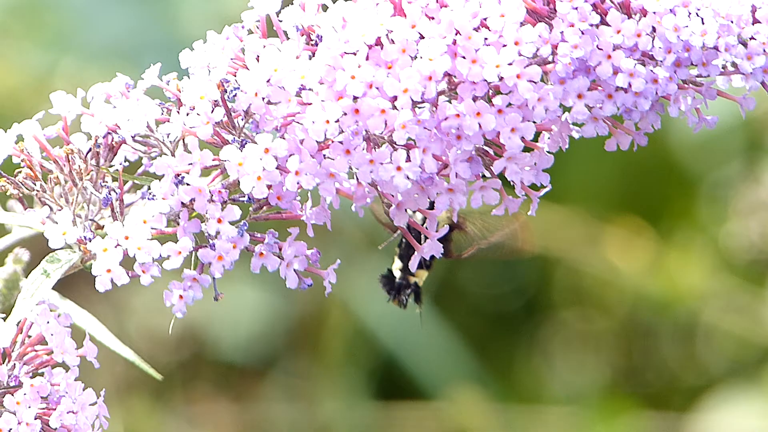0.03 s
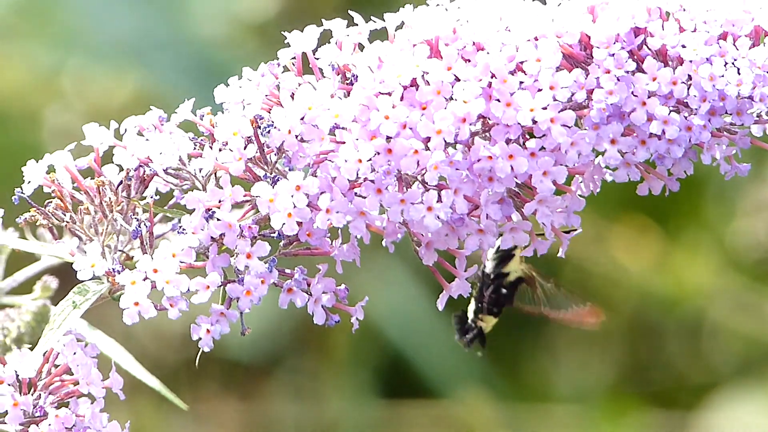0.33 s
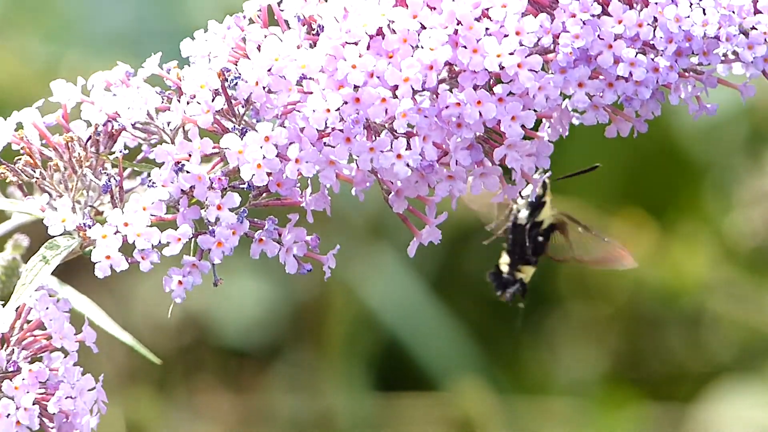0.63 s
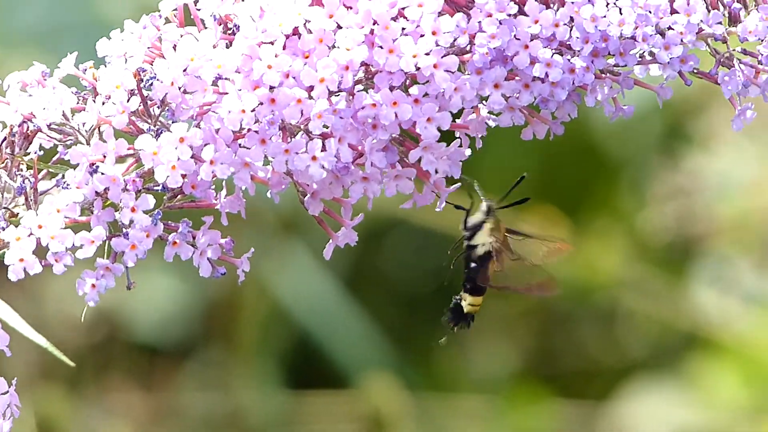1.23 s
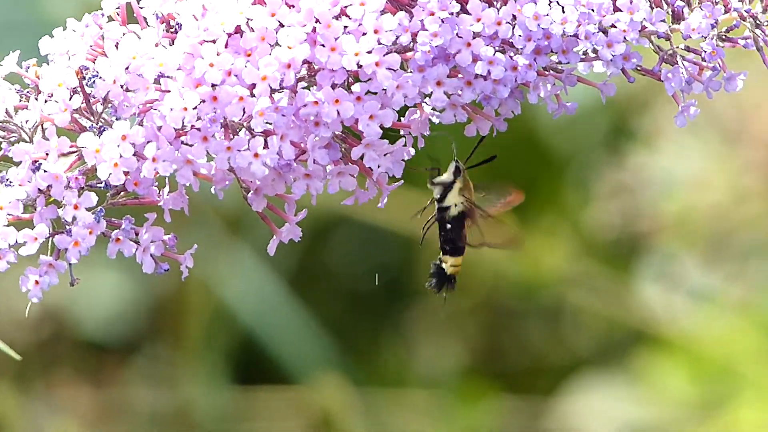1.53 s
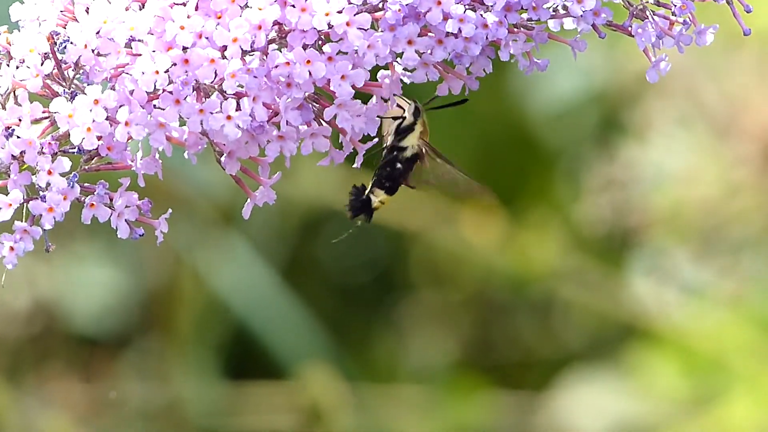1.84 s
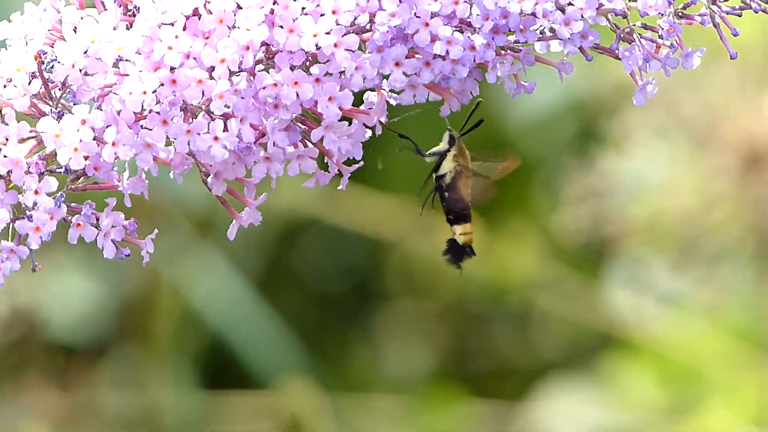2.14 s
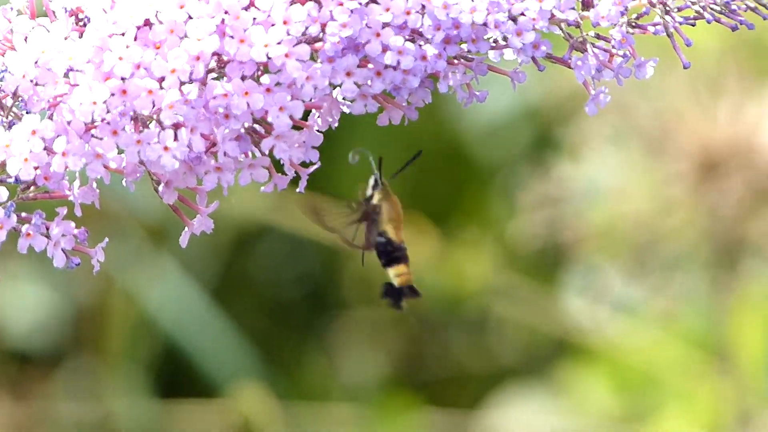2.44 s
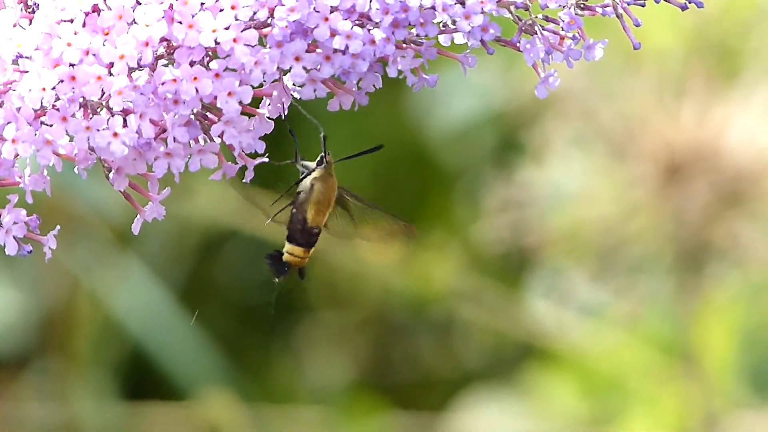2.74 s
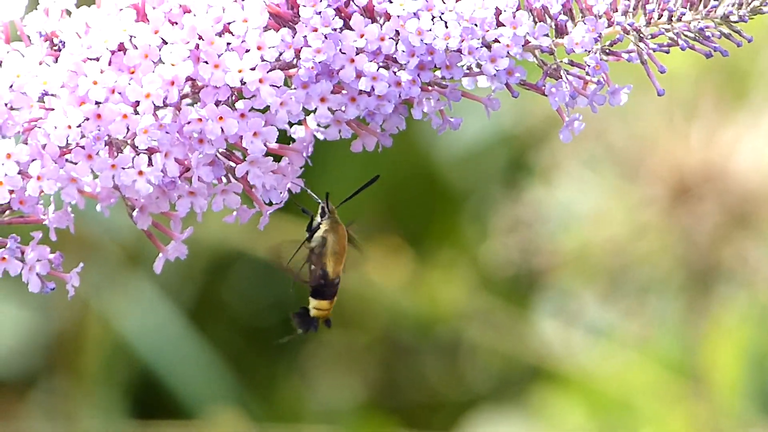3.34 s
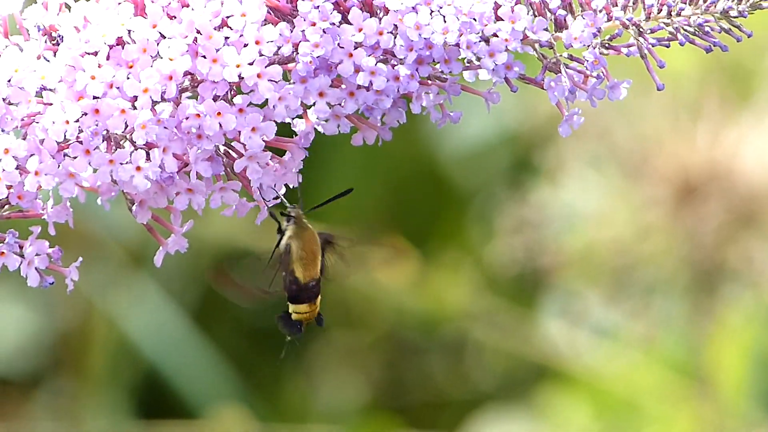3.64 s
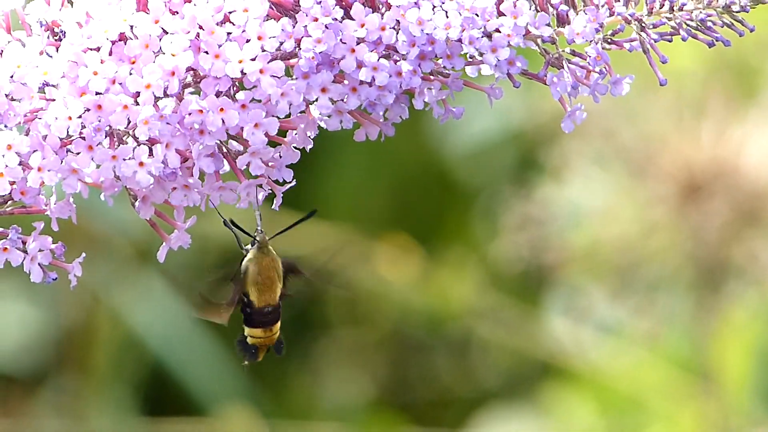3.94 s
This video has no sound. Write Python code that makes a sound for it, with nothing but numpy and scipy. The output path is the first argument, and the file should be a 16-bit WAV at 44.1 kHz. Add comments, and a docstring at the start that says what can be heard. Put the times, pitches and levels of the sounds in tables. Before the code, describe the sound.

Distant traffic rumbles steadily with a low engine drone, heard from a summer garden. A close bush cricket on the right rasps in even pulses over fainter insects, a small bird whistles three times, and the engine slows near the end.

```python
"""A summer garden. After a moment of silence: a wash of far traffic and leaves, a faint mechanical buzz with a
few wavering lines, an insect chorus, and a distant engine's exhaust droning on the right. From 0.4 s a close
bush cricket rasps three chirps a second with its wings; others answer from further off. A small bird whistles
near 1, 2 and 3 s. The engine drifts to the centre throughout and slows from about 3 s."""
import sys
import numpy as np
from scipy import signal
from scipy.fft import rfft, irfft
from scipy.io import wavfile

SR = 44100
rng = np.random.default_rng(int(sys.argv[2]) if len(sys.argv) > 2 else 0)


def inscribe(sig):
    """Save sig as 16-bit PCM at rate SR to the path in sys.argv[1].

    A 1-D sig is mono; a 2-D sig holds one channel per row.
    Samples are clipped to [-1, 1] before scaling.
    """
    pcm = np.round(np.clip(np.atleast_2d(sig).T, -1, 1) * 32767)
    wavfile.write(sys.argv[1], SR, pcm.astype(np.int16))


N = 176400
START_S, TOP_HZ, GARDEN_T60_S = .264, 15200, .2

# mechanical buzz envelope: freq_hz, relative_db
BUZZ_SPECTRUM = [(300, -6), (1700, -1.5), (2400, -4), (3900, -8.5), (4300, 2.5), (5200, -6.5), (7500, -7),
                 (8300, 0), (9500, -6), (12000, -28)]
BUZZ_HZ, BUZZ_DB, BUZZ_SCATTER_DB = 59.005, -61.5, 2
# wavering lines, mostly on harmonics of the buzz: pitch_hz, level_db
BUZZ_LINES = [(355.3, -61.5), (827, -61.5), (945, -72.5), (1242, -66), (1421, -78), (1616, -63.5),
              (1713, -85)]

# far traffic and leaves: freq_hz, relative_db
TRAFFIC_SPECTRUM = [(25, -12), (55, -22), (110, 5.5), (250, -0.5), (400, 2), (600, 2), (830, 1.5),
                    (1000, 0.5), (1230, -4.5), (1450, 0), (1650, -3), (2050, -10.5), (2900, -12.5),
                    (3700, -16), (5500, -15), (7200, -16.5), (10000, -23), (12000, -27.5), (15500, -38)]
# slow drift of the wash: time_s, treble_db, low_mid_db
TRAFFIC_DRIFT = [(.27, -0.3, 0.1), (1, -0.4, -0.7), (2, 1.6, 0.6), (2.6, .4, 1.6), (3.4, 0, 1.3),
                 (4, -.6, 2)]
# left-right likeness of the wash: freq_hz, correlation
TRAFFIC_CORRELATION = [(40, .8), (150, 0.19), (300, -0.24), (550, -0.45), (1000, 0.42), (2000, 0.48),
                       (5000, 0.53), (12000, 0.14)]
TRAFFIC_DB, SWELL_DB, FLICKER_DB = -47, .4, 0.95

# far insect bands: centre_hz, width_hz, level_db, pan_db
CHORUS_BANDS = [(4104, 200, -67, 3), (4720, 540, -67.5, 1), (8400, 1100, -63, -1), (8720, 360, -65.5, 3)]
CHORUS_FLUTTER_DB = 3

# contour of one bird call: age_s, pitch_hz, relative_db
CALL_CONTOUR = [(0, 4200, -5), (.012, 4650, 8), (0.022, 4950, 0), (.034, 4072, 7), (0.047, 3120, 6),
                (.062, 3160, -9), (.076, 3050, 7.5), (.092, 3400, 6), (.102, 4200, -15)]
# bird calls: start_s, gain_db
CALLS = [(1.113, -59.5), (2.038, -60), (2.974, -66)]
BIRD_PAN_DB, BIRD_ECHO_DB, BIRD_ROUGH_DB = 2.5, -5.5, 2.6

# far cricket chirps: start_s, length_s, pitch_hz, relative_db
NEIGHBOUR_CHIRPS = [(.25, 0.067, 8680, -57), (.29, .08, 9200, -62), (.34, .06, 8380, -57),
                    (.41, 0.04, 8400, -61), (.56, .11, 8850, -59.5), (.61, .06, 8370, -55),
                    (.65, 0.057, 9290, -62), (.76, 0.043, 8350, -68), (.89, 0.089, 8400, -57),
                    (1.0, .09, 9170, -60), (1.17, 0.1, 8480, -56), (1.38, 0.09, 8370, -58),
                    (1.42, 0.12, 9290, -63), (1.52, 0.075, 8600, -56.5), (1.67, 0.13, 8250, -60),
                    (1.84, 0.085, 9290, -60), (1.92, .06, 8330, -57), (2.01, 0.02, 8400, -50.5),
                    (2.19, 0.077, 8200, -58), (2.21, 0.048, 8600, -55), (2.3, 0.095, 9240, -67),
                    (2.4, 0.053, 8350, -60), (2.52, .06, 8710, -58), (2.64, 0.083, 8270, -59.5),
                    (2.7, 0.1, 9280, -64), (2.82, 0.062, 8700, -57), (2.87, .07, 8400, -58),
                    (3.11, .09, 9196, -67), (3.12, 0.078, 8300, -60), (3.14, .05, 8700, -49.5),
                    (3.36, 0.0589, 8370, -56), (3.49, 0.082, 8660, -55), (3.56, 0.18, 9110, -62.5),
                    (3.65, 0.078, 8450, -56.5), (3.81, 0.072, 8650, -58.5), (3.93, 0.066, 8610, -55)]
FAR_GAIN_DB, FAR_PAN_DB, FAR_ECHO_DB = 1, -6.5, -4
# near cricket chirps: start_s, length_s, pitch_hz, relative_db
NEAR_CHIRPS = [(.432, .074, 8700, -46), (.767, .078, 8680, -46), (1.098, .072, 8660, -47.5),
               (1.438, .072, 8680, -48.5), (1.777, .074, 8680, -45.5), (2.110, .074, 8720, -46.5),
               (2.440, .078, 8680, -46), (2.742, .084, 8670, -45), (3.062, .08, 8660, -45.5),
               (3.394, .078, 8700, -45), (3.728, .078, 8680, -46)]
NEAR_GAIN_DB, NEAR_PAN_DB, NEAR_ECHO_DB = -1.5, -7, -4.5
STROKE_HZ, STROKE_GLIDE_HZ, RASP_DEPTH = 112.56, 164.5, 0.12
CHIRP_ATTACK_S, CHIRP_RELEASE_S = 0.022, 0.02

# engine speed: time_s, cycle_hz
ENGINE_SPEED = [(0.27, 46.27), (0.6, 45.4), (1.0, 46.2), (1.5, 45.6), (1.85, 45.0), (2.36, 44.3),
                (2.55, 45.1), (2.72, 42.7), (2.92, 42.5), (3.08, 38.58), (3.28, 35.23), (3.55, 33.96),
                (3.72, 32.4), (4.0, 32.2)]
# engine position: time_s, pan_db
ENGINE_PATH = [(.3, -12), (1.1, -9), (1.9, -6), (2.7, -3.5), (3.4, -1.5), (4, -0.5)]
# 3rd engine order: time_s, relative_db
ORDER_3 = [(0.28, -61), (0.63, -51.7), (0.77, -66), (1.02, -45.5), (1.19, -50), (1.82, -48.5), (1.95, -60),
           (2.06, -49), (2.46, -58), (2.57, -44), (2.97, -47.5), (3.07, -53), (3.6, -55.5), (3.98, -48)]
# 4th engine order: time_s, relative_db
ORDER_4 = [(0.28, -47.5), (0.37, -56), (0.44, -45.0), (0.62, -58), (0.7, -43.5), (0.92, -40.5),
           (1.3, -43.5), (1.41, -39.5), (1.81, -41.5), (1.92, -52.5), (1.97, -47.5), (2.01, -53),
           (2.08, -41.5), (2.14, -57), (2.23, -44), (2.37, -46), (2.43, -56), (2.46, -43.5), (2.57, -40.7),
           (2.7, -48), (2.92, -38.5), (3.02, -44), (3.16, -42.5), (3.22, -51), (3.36, -39), (3.45, -49.5),
           (3.57, -42.5), (3.64, -56.4), (3.79, -48), (3.98, -72)]
# 5th engine order: time_s, relative_db
ORDER_5 = [(0.28, -51.5), (0.73, -71), (0.79, -50.2), (1.12, -53.5), (1.63, -44.5), (1.87, -64),
           (2.0, -46.5), (2.12, -58.5), (2.4, -58.5), (3.98, -55.5)]
GAIN_3_DB, GAIN_4_DB, GAIN_5_DB = -1.5, -1.5, -2.5
# weaker engine orders: multiple, start_db, before_slowing_db, slowed_db
WEAK_ORDERS = [(2, -67.5, -58, -77), (6, -68.5, -64, -53.5), (7, -72, -70.5, -60)]
SLOWS_S, SLOWED_S, STRONG_FADE_DB, WEAK_FADE_DB = 2.98, 3.56, 0.73, 3
SPEED_WOBBLE, SMEAR_RAD, PATH_DRIFT_RAD = 0.0024, 1.05, 0.3
# exhaust rumble: freq_hz, relative_db
RUMBLE_SPECTRUM = [(40, -43), (65, -10), (90, -14), (130, 4.5), (190, 6), (245, 7), (300, -6.5), (420, -37)]
RUMBLE_DB, RUMBLE_SPREAD = -54, 0.18


def undb(db):
    """Decibels to gain."""
    return 10 ** (np.asarray(db) / 20)


def unit(x):
    """Scale to rms 1."""
    return x / np.sqrt(np.mean(x ** 2))


def times():
    """Sample times, s."""
    return np.arange(N) / SR


def freqs():
    """Bin frequencies, Hz, floored at 1."""
    return np.maximum(np.arange(N // 2 + 1) * SR / N, 1)


def curve(table, column=1):
    """Table column interpolated over time."""
    rows = np.array(table, float)
    return np.interp(times(), rows[:, 0], rows[:, column])


def over_hz(table):
    """Table interpolated over log frequency."""
    hz, value = np.array(table, float).T
    return np.interp(np.log(freqs()), np.log(hz), value)


def noise(bin_gain):
    """Shaped noise, rms 1."""
    return unit(irfft(rfft(rng.standard_normal(N)) * bin_gain, N))


def wander(rate_hz):
    """Smooth random motion, rms 1."""
    return noise(np.exp(-.5 * (freqs() / max(rate_hz, 1)) ** 2))


def pan(x, pan_db):
    """Stereo placement; pan_db is left minus right."""
    return x * undb(np.array([[.5], [-.5]]) * pan_db)


def echoes(x, echo_db):
    """Short scattered reflections from hedges and walls."""
    tail = rng.standard_normal((2, N)) * undb(-60 * times() / GARDEN_T60_S)
    tail /= np.sqrt(np.sum(tail ** 2, axis=1, keepdims=True))
    return undb(echo_db) * signal.fftconvolve(x[None], tail, axes=1)[:, :N]


def buzz():
    """Steady train of tiny mechanical ticks, heard as a comb of uneven harmonics."""
    harmonics = np.arange(5, 200)
    hz, db = np.array(BUZZ_SPECTRUM, float).T
    harmonic_db = np.interp(np.log(harmonics * BUZZ_HZ), np.log(hz), db)
    harmonic_db += BUZZ_SCATTER_DB * rng.standard_normal(len(harmonics))
    spectrum = np.zeros(2049, complex)
    spectrum[harmonics] = undb(harmonic_db) * np.exp(2j * np.pi * rng.random(len(harmonics)))
    cycle = irfft(spectrum)
    looped = np.interp(times() * BUZZ_HZ % 1, np.arange(len(cycle)) / len(cycle), cycle)
    return undb(BUZZ_DB) * unit(looped)


def buzz_lines():
    """Thin wavering tones, mostly on the buzz's harmonics, different in each ear."""
    def tone(hz, width_hz=7):
        return noise(np.exp(-((freqs() - hz) / width_hz) ** 2))

    return sum(undb(db) * np.array([tone(hz), tone(hz)]) for hz, db in BUZZ_LINES)


def traffic():
    """Wide wash of far tyres and leaves; octaves swell together and flicker alone."""
    colour = undb(over_hz(TRAFFIC_SPECTRUM))
    correlation = np.clip(over_hz(TRAFFIC_CORRELATION), -.95, .95)
    mid = rfft(rng.standard_normal(N)) * colour * np.sqrt(1 + correlation)
    side = rfft(rng.standard_normal(N)) * colour * np.sqrt(1 - correlation)
    stereo = np.array([mid + side, mid - side])
    wash = 0
    for octave in range(4, 15):  # centres 16 Hz to 16 kHz
        band = np.maximum(1 - abs(np.log2(freqs()) - octave), 0)
        drift_db = curve(TRAFFIC_DRIFT, column=1 if octave > 10 else 2)
        wash += irfft(stereo * band, N) * undb(drift_db + FLICKER_DB * wander(12.7))
    return pan(unit(wash), pan_db=0.9) * undb(TRAFFIC_DB + SWELL_DB * wander(1.6))


def insect_chorus():
    """Many far insects merged into fluttering narrow bands."""
    out = 0
    for centre_hz, width_hz, level_db, pan_db in CHORUS_BANDS:
        band = 1 / (1 + ((freqs() - centre_hz) / width_hz) ** 2) ** 2
        voices = unit(noise(band) + np.array([noise(band), noise(band)]))
        flutter_db = CHORUS_FLUTTER_DB * np.tanh(wander(16))
        out += pan(voices * undb(level_db + flutter_db), pan_db)
    return out


def bird():
    """Thin whistle: flicks up, swoops down, turns up again."""
    contour_s, contour_hz, contour_db = np.array(CALL_CONTOUR).T
    song = np.zeros(N)
    for start_s, gain_db in CALLS:
        age_s = times() - start_s
        pitch_hz = np.interp(age_s, contour_s, contour_hz) * (1 + 0.01136 * wander(89))
        envelope = np.interp(age_s, contour_s, undb(contour_db + gain_db), left=0, right=0)
        song += envelope * np.sin(2 * np.pi * np.cumsum(pitch_hz) / SR)
    song *= undb(BIRD_ROUGH_DB * wander(110))
    return pan(song + echoes(song, BIRD_ECHO_DB), BIRD_PAN_DB)


def wing_chirps(chirps):
    """Swelling runs of strokes; each stroke rings the wing with a slightly falling, rasping tone."""
    t, out = times(), np.zeros(N)
    waver_hz = 60 * wander(85)
    force = undb(0.58 * wander(47))
    scrape = RASP_DEPTH * (wander(410) + 1j * wander(380))
    for start_s, length_s, pitch_hz, db in chirps:
        on = (t > start_s) & (t < start_s + length_s)
        age_s = t[on] - start_s
        stroke_phase = age_s * STROKE_HZ * (1 + .02 * rng.standard_normal()) % 1
        ramp = np.minimum(age_s / CHIRP_ATTACK_S, (length_s - age_s) / CHIRP_RELEASE_S)
        envelope = undb(db) * np.clip(ramp, 0, 1) ** 0.37
        wing_hz = pitch_hz + STROKE_GLIDE_HZ * (1 - 2 * stroke_phase) + waver_hz[on]
        tone = np.real((np.sqrt(2) + scrape[on]) * np.exp(2j * np.pi * np.cumsum(wing_hz) / SR))
        out[on] += envelope * np.sin(np.pi * stroke_phase) ** 2 * force[on] * tone
    return out


def crickets():
    """One cricket close on the right; fainter neighbours with more echo."""
    near = undb(NEAR_GAIN_DB) * wing_chirps(NEAR_CHIRPS)
    far = undb(FAR_GAIN_DB) * wing_chirps(NEIGHBOUR_CHIRPS)
    near_stereo = pan(near, NEAR_PAN_DB) + echoes(near, NEAR_ECHO_DB)
    return near_stereo + pan(far + echoes(far, FAR_ECHO_DB), FAR_PAN_DB)


def engine():
    """Low orders of a far exhaust, fading on their way, over an uneven rumble."""
    cycle_hz = curve(ENGINE_SPEED) * (1 + SPEED_WOBBLE * wander(17))
    cycle_rad = 2 * np.pi * np.cumsum(cycle_hz) / SR

    def order(multiple, level_db):
        """One harmonic; echoes spread the phases, blurring pulses into a drone."""
        offset_rad = SMEAR_RAD * round(multiple) ** 2 + PATH_DRIFT_RAD * wander(1)
        return np.sqrt(2) * undb(level_db) * np.sin(round(multiple) * cycle_rad + offset_rad)

    strong_db = [curve(ORDER_3) + GAIN_3_DB, curve(ORDER_4) + GAIN_4_DB, curve(ORDER_5) + GAIN_5_DB]
    drone = 0
    for multiple, level_db in zip((3, 4, 5), strong_db):
        drone += order(multiple, level_db + STRONG_FADE_DB * wander(7))
    for multiple, *stages_db in WEAK_ORDERS:
        level_db = np.interp(times(), [0, SLOWS_S, SLOWED_S], stages_db)
        drone += order(multiple, level_db + WEAK_FADE_DB * wander(2.9))
    colour = undb(over_hz(RUMBLE_SPECTRUM))
    rumble_mid = undb(RUMBLE_DB) * noise(colour)
    rumble_side = undb(RUMBLE_DB) * noise(colour) * np.array([[1], [-1]])
    return pan(drone + rumble_mid, curve(ENGINE_PATH)) + RUMBLE_SPREAD * rumble_side


def scene():
    """Stereo sum of all sources."""
    return engine() + traffic() + buzz_lines() + buzz() + insect_chorus() + crickets() + bird()


def record(dry):
    """Silence until START_S; steep low-pass at TOP_HZ."""
    lowpass = signal.ellip(8, .2, 70, TOP_HZ, fs=SR, output="sos")
    return signal.sosfilt(lowpass, dry * (times() >= START_S))


dry = scene()
out = record(dry)
inscribe(out)
```